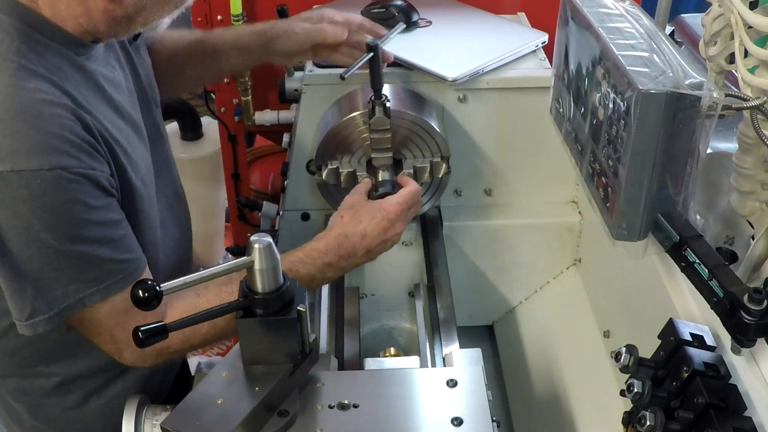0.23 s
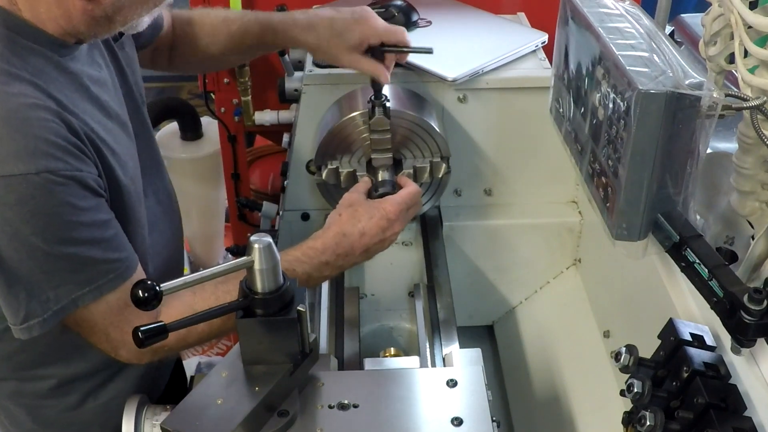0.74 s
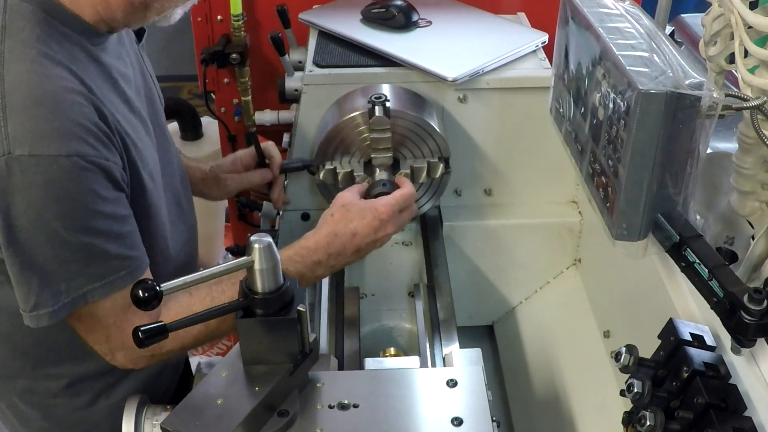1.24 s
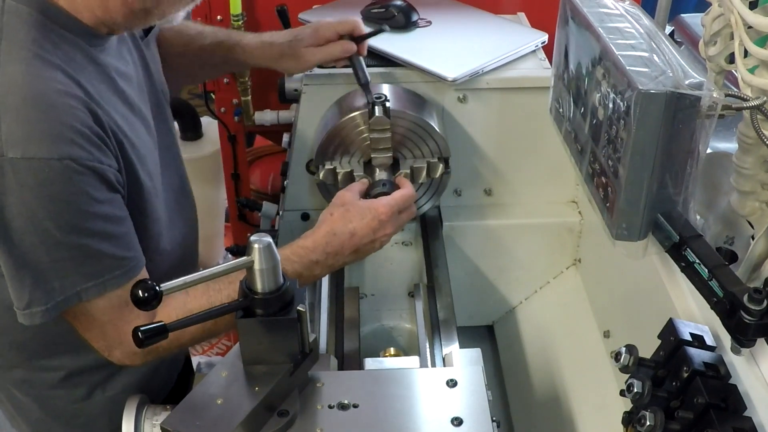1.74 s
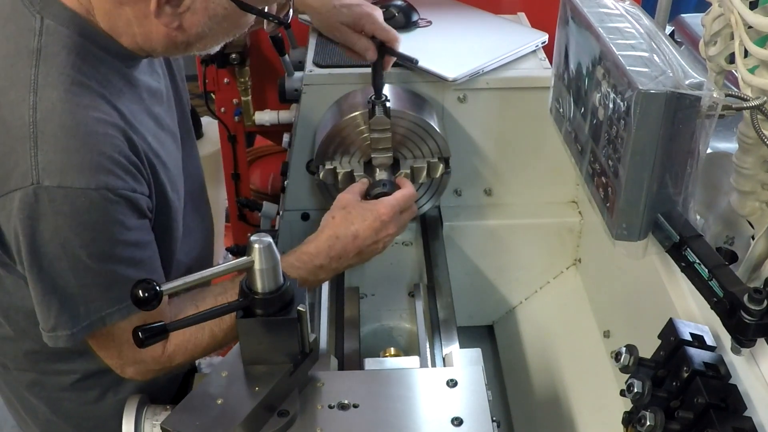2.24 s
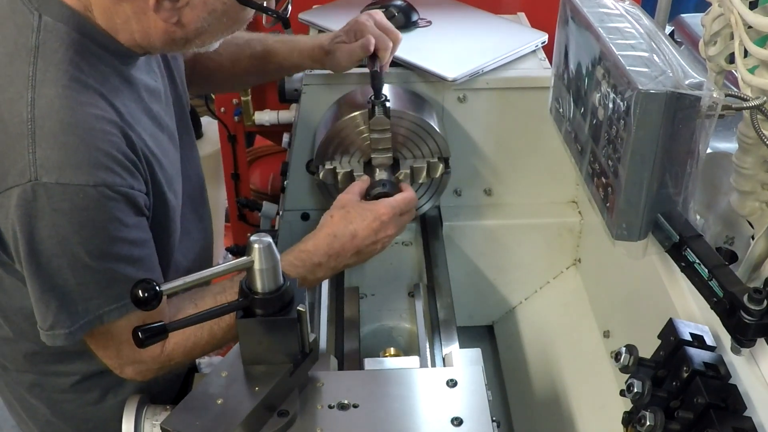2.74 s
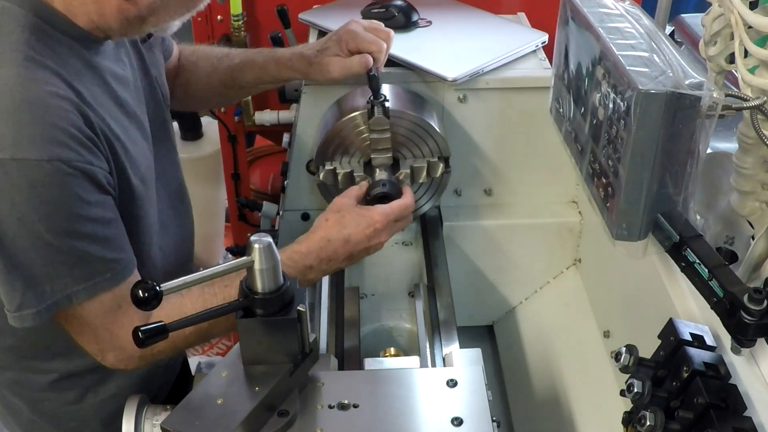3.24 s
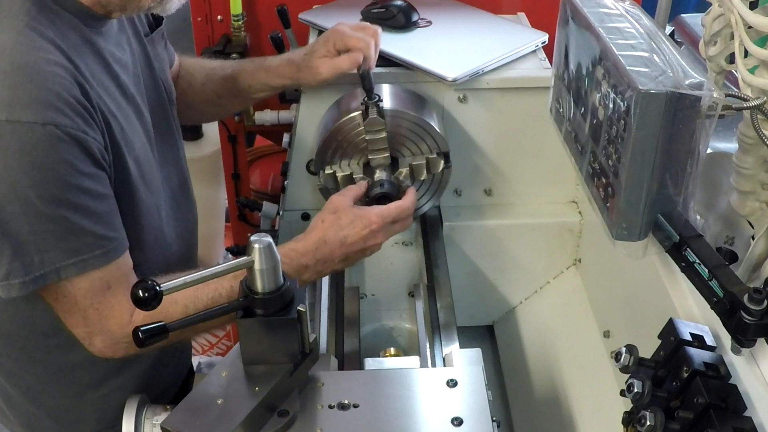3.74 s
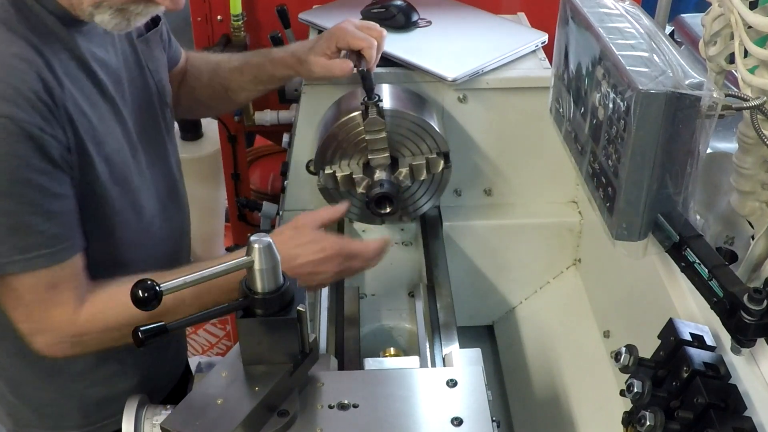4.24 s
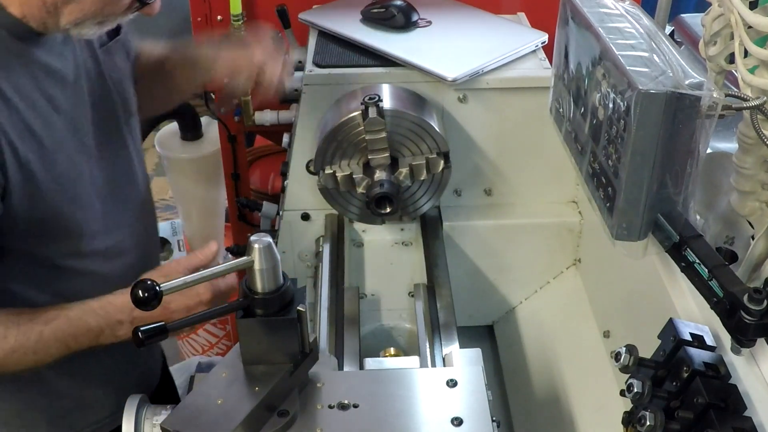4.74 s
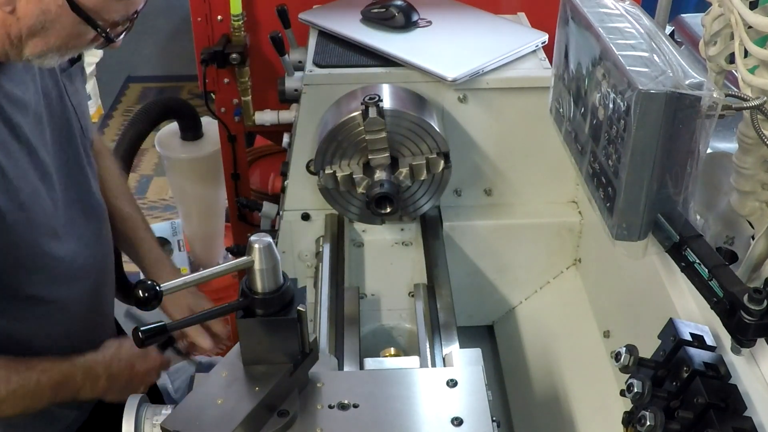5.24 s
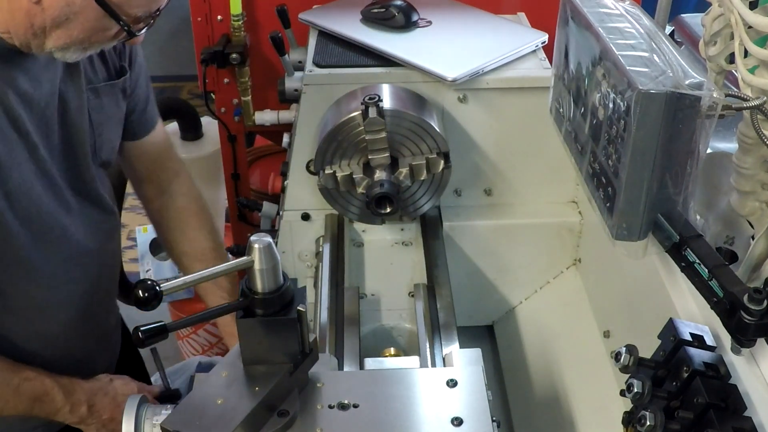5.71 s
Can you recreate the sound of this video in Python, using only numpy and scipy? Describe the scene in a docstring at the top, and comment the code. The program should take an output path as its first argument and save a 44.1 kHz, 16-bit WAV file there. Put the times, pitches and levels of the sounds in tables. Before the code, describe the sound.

Steel clicks, clinks and gritty little slides come from a chuck key working a lathe chuck, heard close in a small shop through a microphone on the machine. Low thumps and faint ticks accompany the handling over a constant rumble. The sharpest knocks ring briefly. Then everything turns slower and deeper, with one more cluster of clinks, a few light taps, a soft sleeve brush and a barely audible high buzz.

```python
"""A small workshop: a steel chuck key is seated, turned and pulled out of a lathe chuck. Blows and
sliding ring the steel; a few knocks ring the key's loose cross bar. The microphone stands on the
machine, so every push booms through the bed, and the swaying stand sets a loose part ticking.
A sleeve brushes past. The sound plays at full speed, then three quarters, then half, which lowers
all pitches and brings a faint, very high mains-rate chirp into hearing."""
import sys
import numpy as np
from scipy import signal
from scipy.fft import rfft, irfft, next_fast_len
from scipy.io import wavfile
from scipy.ndimage import map_coordinates

SR = 44100
rng = np.random.default_rng(int(sys.argv[2]) if len(sys.argv) > 2 else 0)


def generate_wav(signal):
    """Clip the signal to [-1, 1] and save it as 16-bit WAV at the path in sys.argv[1]."""
    frames = np.transpose(np.atleast_2d(signal))
    scaled = np.clip(frames, -1, 1) * 32767
    pcm = np.round(scaled).astype(np.int16)
    wavfile.write(sys.argv[1], SR, pcm)


N = 263277
FS = 2 * SR  # workshop rate: holds the treble that slowing brings down

# Event times are playback times; pitches, rates and decays hold at full speed. Levels are relative.
# playback: start_s, speed_ratio
SPEEDS = [(0, 1), (2.9817, .75), (3.982, .5)]
# key hits chuck: time_s, knock_db, clink_db, ping_over_clink_db, dullness_db
CONTACTS = [(0.122, -49, -61.5, -12, 10), (0.216, -32.5, -40.5, 1, 5), (0.236, -44, -50.5, 6, 9),
            (0.278, -36, -43.5, -2.5, 1.5), (0.298, -34.5, -54, 10, 6), (0.32, -38, -39.5, -6.5, 8.5),
            (0.348, -35, -42.5, -2, 3.8), (0.379, -42, -43, -21, 21), (0.568, -50.5, -61.5, -30, 12),
            (0.685, -36, -53.5, 1, 10), (0.702, -35.5, -42, -11, 8), (0.818, -59, -54.5, -25, 20),
            (0.831, -44, -50, -3, 12), (0.95, -69, -53, -25, 16), (1.014, -48, -52, -28, 11),
            (1.049, -52, -56, -25, 27), (1.083, -46, -51, -30, 30), (1.139, -53, -56, -22, 28),
            (1.18, -46.5, -48.5, -18, 22), (1.24, -44.5, -51, -25, 31), (1.455, -66, -62, 4, -13),
            (1.466, -48.5, -48.5, -1, -1), (1.748, -20.5, -38.5, -1, -11), (1.761, -40.5, -35.5, -2.2, 16),
            (1.8, -34, -39, -.4, 0.5), (1.865, -25, -24.5, -8.5, 3), (1.984, -51, -65.5, 7.5, -3),
            (2.094, -39.5, -49, -6.5, 7), (2.163, -74, -55, -12, 27), (2.226, -38, -46.5, 6, 2.5),
            (2.245, -27, -35.5, -9, 10.5), (2.26, -24, -32, -3.5, -6), (2.329, -64, -84, -.4, 7),
            (2.358, -34.5, -45.5, 3, 4.5), (2.446, -37.5, -48.5, 1.5, 4), (2.495, -38, -51.5, 3.5, 25),
            (2.693, -55.5, -74, -1, -2), (2.899, -59, -67, 9, -1), (2.935, -41, -49, -5, 3.5),
            (3.171, -59, -56.5, -30, -1), (3.297, -64, -57.5, -21, 24), (3.346, -61, -58, -14, 17),
            (3.5, -50, -58.5, -13, 7), (3.788, -35.5, -54, 10.5, 6.5), (3.845, -53, -63.5, 15, 17),
            (3.861, -40, -47, -3.5, 11.5), (3.949, -53, -58.5, -5, 11), (4.353, -69, -63.5, -6, 18),
            (4.394, -70, -60.5, -19, 18), (4.413, -77, -57, -13, 17), (4.453, -61, -56.5, -.4, 1),
            (5.592, -74, -56, -25, 26)]
# per treble family: over_clink_db
TREBLE_DB = [-5, -12, -20]
# per treble family: dullness_share
DULLNESS_SHARES = [0.9, 0.68, 1]
# modes of key and chuck: pitch_hz, level_db, t60_s
STEEL_MODES = [(495, -15, .1), (560, -10, .08), (614, -1, .12), (664, 0, .12), (760, -1.5, .11),
               (795, -2.5, .11), (880, -14, .08), (1195, -9, .05), (1420, -4, .09), (1497, -16, .1),
               (1583, -10, .09), (1626, -13, .09), (1790, -13, .09), (1880, -14, .09), (1948, -11, .11),
               (2156, -13, .07), (2275, -10, .08), (3197, -12, .08), (3385, -13, .09), (5050, -29, .07),
               (5250, -26, .08), (7332, -31, .07), (7585, -26, .08), (9162, -33, .06), (9550, -31, .06)]
# mode families (knock, clink, ping, three treble): low_hz, high_hz, clatter_db, clatter_t60_s
FAMILIES = [(520, 834, -6, 0.11), (1147, 1930, 5, 0.058), (1770, 2310, -7, 0.089),
            (2730, 4200, -4.5, 0.062), (4340, 11100, 1, 0.072), (8500, 10900, 5, 0.075)]
# steel slides on steel: start_s, end_s, knock_family_db, clink_family_db
STROKES = [(0.0, 0.01, -42.5, -58), (0.205, 0.392, -44.5, -53), (0.907, 1.236, -55.5, -58),
           (1.773, 1.86, -78, -73), (1.95, 2.023, -55, -56.5), (2.163, 2.223, -64, -55),
           (2.325, 2.384, -48, -46.5), (2.927, 3.04, -59, -64.5), (3.793, 3.993, -64, -64),
           (4.322, 4.47, -82, -78), (5.613, 5.67, -61, -56), (5.932, 5.97, -56, -66)]
# modes, a list each for stand, bed, headstock, panel: pitch_hz, level_db, width_hz
MACHINE_MODES = [
    [(60, 0, 7), (84, -3, 15)],
    [(129, 0, 12), (149, 0, 12)],
    [(174, 0, 12), (197, -10, 15)],
    [(230, -8, 30), (275, -6, 30), (330, -5, 20), (361, 0, 16), (410, -9, 30)],
]
# stand, bed, headstock, panel: fall_db_per_s
MACHINE_FALL_DB_PER_S = [37.7, 79.4, 146, 159.6]
# hands push the machine: peak_s, bed_db, headstock_db, panel_db
PUSHES = [(0.043, -31.5, -31.5, -50), (.11, -61, -46, -61), (0.251, -36.5, -27, -39.5),
          (0.309, -27, -29, -34), (0.388, -31.5, -24, -50), (0.461, -26.5, -48, -53),
          (0.743, -23, -21, -38), (0.822, -31, -31, -44), (0.899, -39, -31.5, -52),
          (1.099, -35.5, -42, -61.5), (1.211, -39.5, -39.5, -65), (1.318, -39, -42.5, -72),
          (1.42, -45.5, -45.5, -65), (1.774, -30.5, -38, -43), (1.828, -39.5, -32, -47),
          (1.898, -58, -31.5, -51), (2.01, -52, -44.5, -77), (2.283, -28, -29.5, -39),
          (2.38, -41, -29.5, -46), (2.513, -31, -31, -49), (2.66, -67, -47, -57.5),
          (2.718, -43, -33.5, -68), (2.798, -36, -43.5, -62.5), (2.958, -32.5, -24.5, -44),
          (3.055, -60, -38.5, -58), (3.488, -45, -38.5, -59), (3.608, -43.5, -40, -80),
          (3.814, -37, -32.5, -44.5), (3.86, -45, -32, -41.5), (3.918, -26.5, -26.5, -50),
          (4.19, -40.5, -43, -82), (4.4, -53, -51.5, -65), (5.615, -42.5, -68, -84.5),
          (5.73, -39.5, -55, -87), (5.85, -42.5, -49, -86)]
# room rumble and microphone hiss: frequency_hz, density_db
NOISE_SPECTRUM = [(10, -52), (22, -15.5), (40, -14.5), (100, -20), (250, -28), (600, -38), (1500, -47),
                  (4000, -49.5), (9000, -51), (15000, -55.5), (18000, -58), (26000, -61), (34000, -62.5)]
# runs of ticks: start_s, end_s, level_db
TICK_RUNS = [(0.013, .17, -45.5), (0.447, .65, -56), (1.308, 1.75, -53), (2.587, 2.9, -54.5),
             (3.171, 3.77, -56), (4.11, 4.7, -56.5)]
# cross bar modes: pitch_hz, t60_s
BAR_MODES = [(3200, 1.1), (7585, .22), (12640, .1), (14490, .11)]
# knocks on the cross bar: time_s, mode1_db, mode2_db, mode3_db, mode4_db
BAR_KNOCKS = [(1.748, -62, -43, -54, -57), (1.865, -58, -54, -64, -57), (2.26, -51, -54, -66, -41)]

STROKE_RISE_DB_PER_S, STROKE_FALL_DB_PER_S, PUSH_RISE_DB_PER_S = 450, 250, 490
SWING_PERIOD_S, ROCKING_DB, STAND_REST_DB = 0.048, -45, -68.5


def amp(db):
    """Gain of a level in dB."""
    return 10 ** (np.asarray(db) / 20)


def unit(x):
    """x at rms 1."""
    return x / np.sqrt(np.mean(x ** 2) + 1e-20)


def shop_s(playback_s):
    """Workshop time heard at a playback time."""
    start_s, speed = np.transpose(SPEEDS)
    edges_s = np.append(start_s, N / SR + 1)
    return np.interp(playback_s, edges_s, np.append(0, np.cumsum(np.diff(edges_s) * speed)))


SHOP_N = int(shop_s(N / SR) * FS) + 8


def wobble(rate_hz):
    """Smooth random curve, rate_hz knots a second."""
    knots = rng.standard_normal(int(SHOP_N * rate_hz / FS) + 4)
    return map_coordinates(knots, [np.arange(SHOP_N) * rate_hz / FS])


def filtered(x, response):
    """x through a complex frequency response."""
    size = 2 * next_fast_len((len(x) + FS) // 2)
    return irfft(rfft(x, size) * response(np.fft.rfftfreq(size, 1 / FS)), size)[:len(x)]


def band(f, low_hz, high_hz, order=4):
    """Causal band-pass: one wide resonance applied order times."""
    width_hz = 1.3 * (high_hz - low_hz)
    return (1j * f * width_hz / (low_hz * high_hz - f * f + 1j * f * width_hz)) ** order


def swells(start_s, end_s, hold_db, rise_db_per_s, fall_db_per_s):
    """Gain of overlapping swells that rise, hold and die away."""
    t = np.arange(0, SHOP_N / FS + .01, .001)[:, None]
    before_s, after_s = np.maximum(shop_s(start_s) - t, 0), np.maximum(t - shop_s(end_s), 0)
    gains = amp(hold_db - rise_db_per_s * before_s - fall_db_per_s * after_s)
    return np.interp(np.arange(SHOP_N) / FS, t[:, 0], np.sqrt(np.sum(gains ** 2, axis=1)))


def steel_family(f, low_hz, high_hz, clatter_db, dense_ring):
    """Response of one family of steel modes over the clatter of modes too dense to tell apart."""
    modes = [(hz, db, np.log(1000) / (np.pi * t60_s))
             for hz, db, t60_s in STEEL_MODES if low_hz < hz < high_hz]
    ring = sum((-1) ** k * amp(db) * 1j * f / (hz * hz - f * f + 1j * f * width_hz)
               for k, (hz, db, width_hz) in enumerate(modes))
    ring = ring * band(f, low_hz, high_hz, order=1)
    clatter = band(f, low_hz, high_hz) * rfft(dense_ring, 2 * len(f) - 2)
    return ring / np.linalg.norm(ring) + amp(clatter_db) * clatter / np.linalg.norm(clatter)


def chuck_key():
    """Contacts are sharp blows with a gritty settling; sliding adds clumped grit; both ring the steel."""
    time_s, knock_db, clink_db, ping_db, dullness_db = np.transpose(CONTACTS)
    treble_db = [clink_db + db - share * dullness_db for db, share in zip(TREBLE_DB, DULLNESS_SHARES)]
    blow_db = [knock_db, clink_db, clink_db + ping_db] + treble_db
    t = np.arange(FS // 4) / FS
    settle = amp(-60 * t / 0.046) * (1 - np.exp(-t / 0.00076))
    grit = amp(4 * wobble(40) + 3 * wobble(300))
    start_s, end_s, *stroke_db = np.transpose(STROKES)
    low, mid = [swells(start_s, end_s, db, STROKE_RISE_DB_PER_S, STROKE_FALL_DB_PER_S)
                for db in stroke_db]
    slide_gains = [low] + [mid * amp(db) for db in (-2.5, -11, -22.5, -31.5, -33)]
    out = np.zeros(SHOP_N)
    for k, (low_hz, high_hz, clatter_db, t60_s) in enumerate(FAMILIES):
        dense_ring = rng.standard_normal(len(t)) * amp(-60 * t / t60_s)
        response = lambda f: steel_family(f, low_hz, high_hz, clatter_db, dense_ring)
        lead_s = 0.0028 / (1 + k / 2)  # higher families start later
        blows = np.zeros(SHOP_N)
        blows[np.round((shop_s(time_s) - lead_s) * FS).astype(int)] = amp(blow_db[k])
        settling = signal.fftconvolve(blows, settle)[:SHOP_N] * rng.standard_normal(SHOP_N)
        noise_gain = np.std(filtered(rng.standard_normal(SHOP_N), response))
        sliding = slide_gains[k] * unit(grit * rng.standard_normal(SHOP_N))
        force = amp(1.5) * (22 * blows + settling) + amp(-3) * sliding
        out += filtered(force, response) / noise_gain
    return out


def machine_boom():
    """Pushes ring the heavy parts' low modes; changing hand forces make phase and share wander."""
    t, out = np.arange(SHOP_N) / FS, np.zeros(SHOP_N)
    peak_s, bed_db, headstock_db, panel_db = np.transpose(PUSHES)
    stand_db = -48.5 + 0.74 * (bed_db + 35)
    gains = [swells(peak_s, peak_s, db, PUSH_RISE_DB_PER_S, fall)
             for db, fall in zip([stand_db, bed_db, headstock_db, panel_db], MACHINE_FALL_DB_PER_S)]
    gains[0] = np.hypot(gains[0], amp(STAND_REST_DB))
    for gain, modes in zip(gains, MACHINE_MODES):
        part = sum(amp(db + 3 * wobble(width_hz)) * np.sin(2 * np.pi * hz * t + 1.3 * wobble(width_hz))
                   for hz, db, width_hz in modes)
        out += gain * unit(part)
    return out


def stand_rocking():
    """The stand's slowest swing, which never stops."""
    t = np.arange(SHOP_N) / FS
    gain = amp(ROCKING_DB + 4.9 * wobble(4.94))
    return gain * np.sin(2 * np.pi * t / SWING_PERIOD_S + 0.96 * wobble(8.5))


def rumble_and_hiss(level_db=-54):
    """Steady room rumble and microphone hiss."""
    hz, density_db = np.transpose(NOISE_SPECTRUM)
    response = lambda f: amp(np.interp(np.log(f + 1), np.log(hz), density_db))
    return amp(level_db) * unit(filtered(rng.standard_normal(SHOP_N), response))


def mains_chirp(pitch_hz=17120, mains_hz=60, length_s=0.003, offset_s=0.002, level_db=-66.5):
    """Electronics give a short high tone once each mains cycle."""
    t = np.arange(SHOP_N) / FS
    from_peak_s = (t - offset_s) % (1 / mains_hz) - 0.5 / mains_hz
    return amp(level_db) * np.exp(-(2 * from_peak_s / length_s) ** 2) * np.sin(2 * np.pi * pitch_hz * t)


def loose_part(t60_s=0.03):
    """Runs of faint ticks, one per swing of the stand: noise bursts in the chuck's middle band."""
    ticks, t = np.zeros(SHOP_N), np.arange(FS // 30) / FS
    for start_s, end_s, level_db in TICK_RUNS:
        times_s = np.arange(shop_s(start_s), shop_s(end_s), SWING_PERIOD_S)
        scatter_db = rng.standard_normal(16)[:len(times_s)]
        ticks[np.round(times_s * FS).astype(int)] = amp(level_db + scatter_db)
    force = signal.fftconvolve(ticks, amp(-60 * t / t60_s))[:SHOP_N] * rng.standard_normal(SHOP_N)
    return amp(14.5) * filtered(force, lambda f: band(f, 1000, 2110))


def cross_bar(attack_s=0.00098):
    """A few knocks leave the key's loose bar ringing cleanly."""
    out, t = np.zeros(SHOP_N + FS), np.arange(FS) / FS
    attack = 1 - np.exp(-t / attack_s)
    for time_s, *levels_db in BAR_KNOCKS:
        for (hz, t60_s), db in zip(BAR_MODES, levels_db):
            ring = amp(db - 60 * t / t60_s) * attack * np.sin(2 * np.pi * hz * t)
            out[round(shop_s(time_s) * FS):][:FS] += ring
    return out[:SHOP_N]


def sleeve(peak_s=5.37, length_s=0.09, level_db=-73):
    """Cloth brushes past: one soft swell of high noise."""
    swell = np.exp(-((np.arange(SHOP_N) / FS - shop_s(peak_s)) / (length_s / 2)) ** 2)
    friction = filtered(rng.standard_normal(SHOP_N), lambda f: band(f, 7700, 12000))
    return amp(level_db) * swell * unit(friction)


def room(x, t60_s=0.16, cutoff_hz=5000, delay_samples=400):
    """Small cluttered shop: a short diffuse tail, duller than the direct sound."""
    t = np.arange(FS // 2) / FS
    tail = rng.standard_normal(len(t)) * amp(-60 * t / t60_s)
    tail = filtered(tail, lambda f: 1 / (1 + 1j * f / cutoff_hz))
    return signal.fftconvolve(np.pad(x, (delay_samples, 0)), tail / np.linalg.norm(tail))[:SHOP_N]


def scene():
    """The workshop, played at a speed that steps down twice."""
    steel = chuck_key() + cross_bar() + loose_part()
    shop = steel + amp(-14) * room(steel) + machine_boom() + stand_rocking()
    shop += sleeve() + rumble_and_hiss() + mains_chirp()
    played = map_coordinates(shop, [shop_s(np.arange(2 * N) / FS) * FS])
    played = filtered(played, lambda f: f < SR / 2)[::2]
    played[round(SPEEDS[1][0] * SR)] -= amp(-21)  # tick at the first speed step
    return played[None]


def record(dry, cutoff_hz=15800):
    """Brick-wall low-pass."""
    size = next_fast_len(N + SR // 4)
    return irfft(rfft(dry, size) * (np.fft.rfftfreq(size, 1 / SR) < cutoff_hz), size)[:, :N]


dry = scene()
out = record(dry)
generate_wav(out)
```